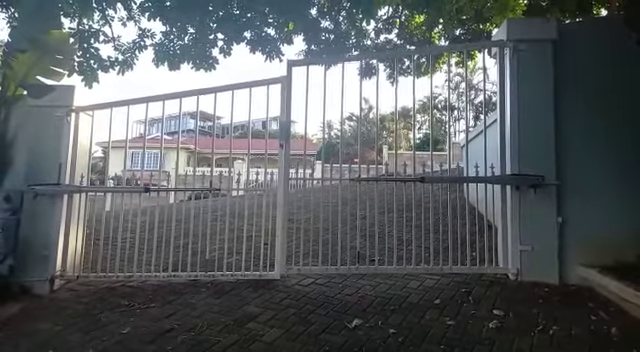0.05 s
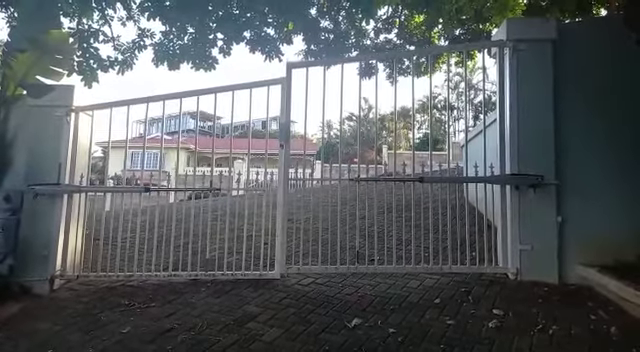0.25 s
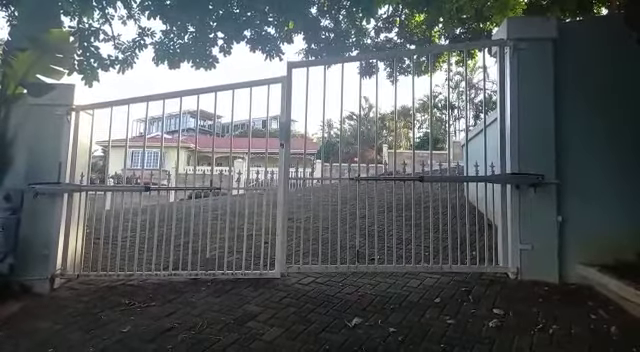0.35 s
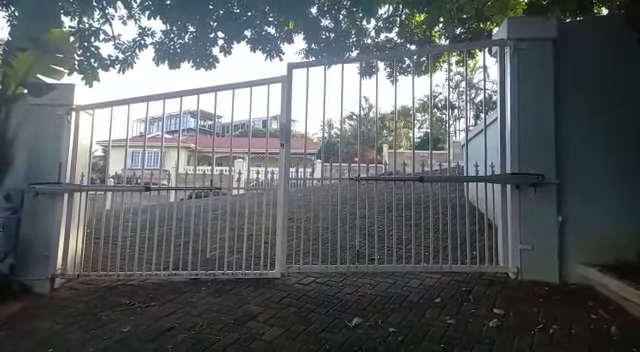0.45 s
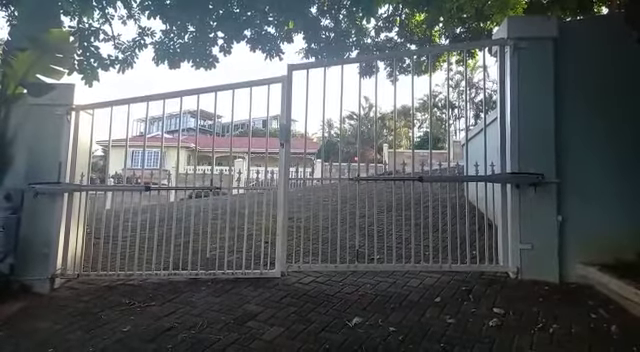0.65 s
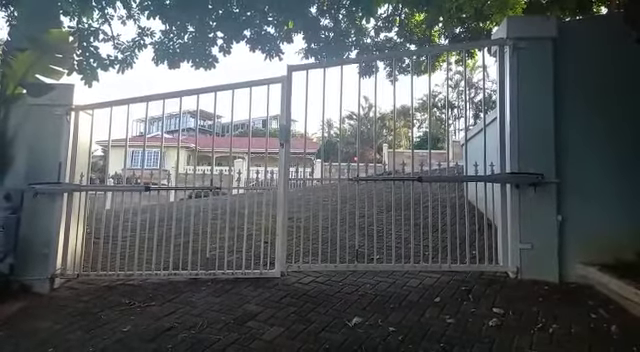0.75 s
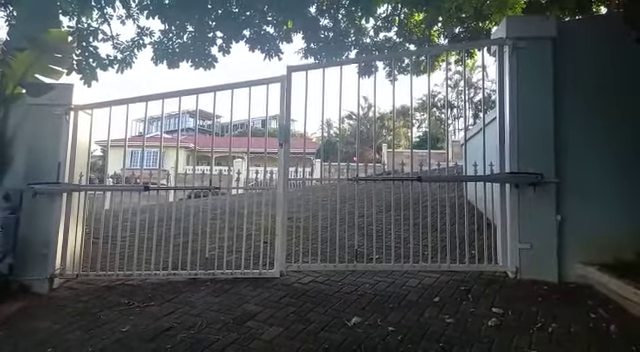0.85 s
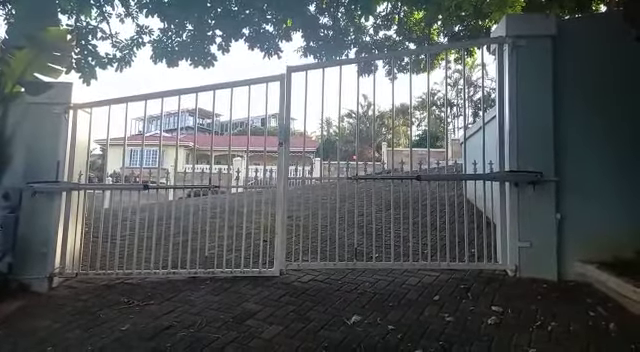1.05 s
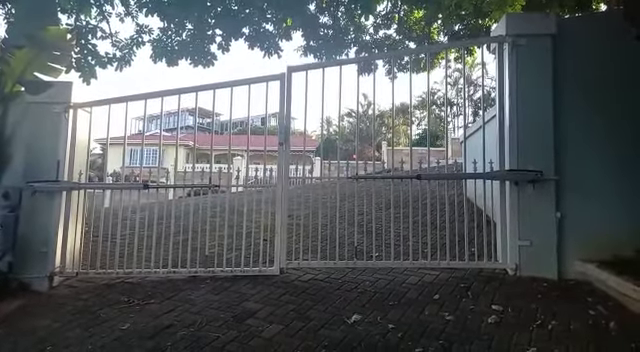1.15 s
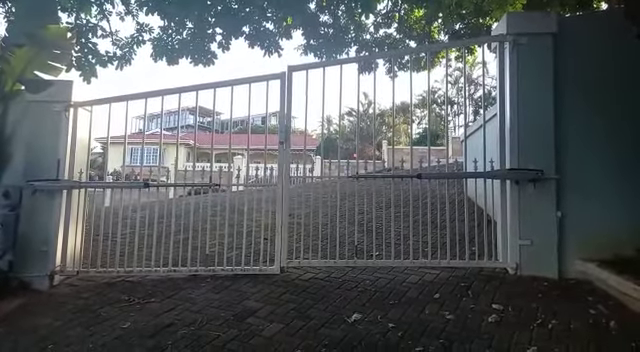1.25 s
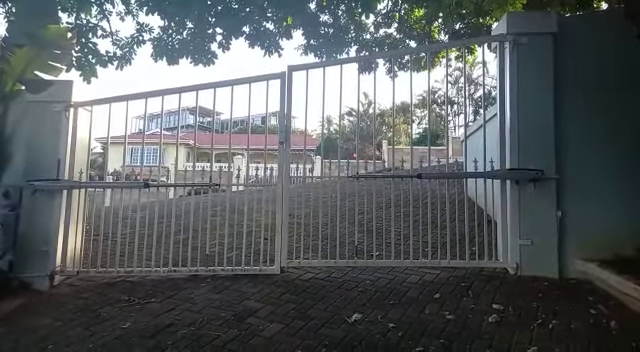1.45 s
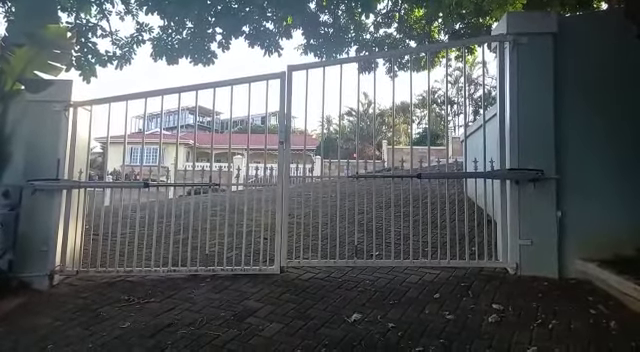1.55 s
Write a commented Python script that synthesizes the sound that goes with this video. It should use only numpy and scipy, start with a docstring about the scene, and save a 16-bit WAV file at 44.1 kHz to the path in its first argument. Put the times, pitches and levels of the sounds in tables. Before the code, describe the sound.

A metal gate latch clacks, a bar rings, and the latch slams shut.

```python
"""A metal gate is worked between hard driveway walls: the latch clacks open, a steel bar is knocked and
rings, metal slides, the frame bumps softly twice and the latch slams home. Each blow is a few quick
contacts that crack and set the metal ringing; the slides are showers of tiny catches. The walls add a
dense, short echo. Underneath lie a low outdoor rumble, steady air, a faint hiss and a hollow drone."""
import sys
import numpy as np
from scipy import signal
from scipy.fft import rfft, irfft
from scipy.io import wavfile
from scipy.ndimage import uniform_filter1d

SR = 44100
rng = np.random.default_rng(int(sys.argv[2]) if len(sys.argv) > 2 else 0)


def pcm_store(signal):
    """Save signal as 16-bit PCM."""
    levels = np.round(np.clip(np.atleast_2d(signal), -1, 1) * 32767)
    wavfile.write(sys.argv[1], SR, levels.astype(np.int16).T)


N = 70560


def latch_release():
    """The latch lets go in two quick contacts: a dry clack with a short ring."""
    # latch contacts (time [s], crack level [dB], ring level [dB])
    contacts = [(.199, -50.5, -51.5), (.207, -46.5, -78)]
    # tone of the crack (frequency [Hz], gain [dB])
    tone = [(110, -20.5), (200, -7), (520, -12), (780, -3), (1100, -7), (1400, 0.5), (2100, -4.5),
            (2800, -10), (4400, -0.5), (6100, -4.5), (7300, -14.5), (11600, -24), (15000, -38)]
    # latch resonances (frequency [Hz], relative level [dB], t60 [s])
    modes = [(770, -7, .06), (1010, -8, .06), (1330, -5, .08), (1698, -7, .08), (2100, -6, .08),
             (4310, 0, .07), (4600, -2, .07), (5378, -6, .08), (6207, -5, .1)]
    return clank(contacts, tone, modes, lead_s=.00009, ring_echo_db=3)


def latch_slam():
    """The latch touches, then slams home with a hard, bright crack."""
    # touch and slam (time [s], crack level [dB], ring level [dB])
    contacts = [(1.229, -53, -82), (1.232, -44.5, -51.5)]
    # tone of the crack (frequency [Hz], gain [dB])
    tone = [(300, -40), (450, -19), (650, -9), (1000, -10.5), (1300, -5.5), (2000, -2), (2400, -3),
            (2900, -1.5), (3400, -3), (4000, -1.5), (5200, -2), (6200, -12.5), (7400, -17.5), (8600, -16),
            (9700, -27.5), (10800, -16), (12000, -29.5), (15500, -33.5)]
    # resonances of the closing latch (frequency [Hz], relative level [dB], t60 [s])
    modes = [(1440, -8, .05), (1700, -7, .07), (2085, -2, .11), (2482, -6, .08), (2907, 1, .08),
             (3787, -3, .08), (4086, -3, .07), (4360, -5, .08), (4592, -4, .07), (4962, 0, .09),
             (5205, -2, .08)]
    return clank(contacts, tone, modes, lead_s=.00005, ring_echo_db=3)


def steel_bar():
    """A knocked bar chatters against its stop and rings on in close, beating modes."""
    # knock and chatter (time [s], crack level [dB], ring level [dB])
    contacts = [(.322, -53, -64), (.3245, -49.5, -43), (.3444, -59, -45.5), (.4057, -70, -50.5)]
    # tone of the knock (frequency [Hz], gain [dB])
    tone = [(150, -8), (500, -10.5), (1000, 0), (1500, 7), (2100, 10), (2800, 0.5), (3300, -1), (4400, 4),
            (5400, -8.5), (8000, -24), (15000, -47)]
    # bar resonances (frequency [Hz], relative level [dB], t60 [s])
    modes = [(1284, -9, .26), (1296, -7, .29), (1302, 0, .42), (1372, -9, .34), (1585, -15, .26),
             (1700, -22, .22), (1883, -19, .22), (1950, -14, .3), (2080, -17, .25), (2467, -22, .28),
             (4164, -18, .16), (4368, -21, .1)]
    return clank(contacts, tone, modes, lead_s=.00022, ring_echo_db=-3.5)


def frame_bumps():
    """The frame takes two soft double bumps and answers with a lower, duller ring."""
    # frame contacts (time [s], crack level [dB], ring level [dB])
    contacts = [(.696, -76, -73.5), (.722, -71, -77), (1.103, -77.5, -75), (1.133, -78, -84)]
    # tone of a bump (frequency [Hz], gain [dB])
    tone = [(200, -2.5), (500, -7), (800, 4.5), (1050, 1), (1600, -5), (2600, -8), (5000, -42)]
    # frame resonances (frequency [Hz], relative level [dB], t60 [s])
    modes = [(756, 4.5, 0.2), (734, -10, 0.19), (821, 4, 0.064), (970, -11, 0.047)]
    return clank(contacts, tone, modes, lead_s=.00005, ring_echo_db=3)


def clank(contacts, tone, modes, lead_s, ring_echo_db):
    """Metal meets metal in quick contacts; each one cracks and sets the part ringing."""
    contact_s, crack_direct_db = .00094, -13.5
    t, straight, echo, out = seconds(), direct(lead_s), walls(), 0
    ringing = ring(modes, straight + undb(ring_echo_db) * echo)
    for onset_s, crack_db, ring_db in contacts:
        grit = rng.standard_normal(N) * np.exp(-t / contact_s)
        flat_grit = irfft(np.exp(1j * np.angle(rfft(grit))), N)  # equally strong at every frequency
        force = flat_grit * (t < 10 * contact_s)
        crack = through(colour(force, tone), undb(crack_direct_db) * straight + echo)
        out = out + delay(level(crack, crack_db) + undb(ring_db) * ringing, onset_s)
    return out


def ring(modes, path):
    """Decaying modes of a steel part, heard along a stereo path."""
    t, out = seconds(), 0
    attack = 1 - np.exp(-t / .001)
    for hz, db, t60 in modes:
        partial = attack * np.sin(2 * np.pi * hz * t) * np.exp(-np.log(1000) * t / t60)
        out = out + level(through(partial, path), db)
    return level(out, 0)


def slides():
    """Metal slips over metal in dense tiny catches that swell and fade, heard through the wall echo."""
    # strokes (peak time [s], rise [s], fall [s], level [dB], tilt [dB/octave])
    strokes = [(0.0, 0.0067, 0.036, -74, -3.5), (0.112, 0.063, 0.09, -70.5, -4),
               (0.169, 0.0017, 0.063, -70, -5.5), (0.731, 0.01, 0.012, -68, -1),
               (.765, 0.0072, 0.0067, -67.5, -0.5)]
    # tone of the scrape (frequency [Hz], gain [dB])
    tone = [(400, -14.5), (750, -11), (1100, -4.5), (1600, 0.5), (2100, 0), (3000, -4), (3800, -2),
            (4350, 3.5), (5000, -5.5), (6200, -6), (8000, -22.5), (10000, -50), (14000, -43)]
    catches_per_s, scatter_db = 2500, 2
    t, echo, out = seconds(), walls(), 0
    for peak_s, rise_s, fall_s, db, tilt_db in strokes:
        catches = (rng.random(N) < catches_per_s / SR) * rng.standard_normal(N)
        catches *= undb(scatter_db * rng.standard_normal(N))
        pressure = np.exp(-np.maximum((peak_s - t) / rise_s, (t - peak_s) / fall_s))
        scrape = colour(catches * pressure, tone, tilt_db)
        out = out + level(through(scrape, echo), db)
    return out


def direct(lead_s):
    """The straight path to two microphones, reaching the left one lead_s earlier."""
    click = signal.unit_impulse(N)
    return np.array([click, delay(click, lead_s)])


def walls():
    """Echo of the walls: a few distinct early reflections in a dense tail whose bass lasts longest."""
    # decay of the echo (frequency [Hz], t60 [s])
    decay_times = [(150, 0.936), (500, 0.47), (1500, 0.44), (4000, 0.32), (8000, 0.4), (15000, .28)]
    reflections_per_s, early_db, early_decay_s, build_s = 400, -10, .01, .00067
    t, hz, out = seconds(), np.fft.rfftfreq(N, 1 / SR), 0
    early = rng.standard_normal((2, N)) * (rng.random((2, N)) < reflections_per_s / SR)
    early *= undb(early_db) * np.sqrt(SR / reflections_per_s) * np.exp(-t / early_decay_s)
    spectrum = rfft(diffuse(rng.standard_normal((2, N)) + early))
    centres = np.geomspace(100, 16000, 9)
    for centre, weights in zip(centres, np.eye(len(centres))):
        band = irfft(spectrum * at_hz(list(zip(centres, weights)), hz), N)
        out = out + band * np.exp(-np.log(1000) * t / at_hz(decay_times, centre))
    build_up = 1 - np.exp(-t / build_s)
    return level(out * build_up, 0) / np.sqrt(N)  # unit energy


def outdoors():
    """Beds of shaped noise: a wavering rumble, steady air, a faint hiss and a hollow drone."""
    # tone of each bed (frequency [Hz], gain [dB])
    rumble_tone = [(25, -44.5), (45, -26), (68, 11.5), (85, 10), (115, 2), (200, -28.5), (400, -36)]
    air_tone = [(100, 5), (200, -1), (400, -4), (800, -14), (1500, -29), (3000, -33), (6600, -67)]
    hiss_tone = [(2500, -6), (4000, -2), (6600, 0), (7800, -16), (15500, -19)]
    drone_tone = [(500, -50.5), (700, 12), (775, 19), (860, 12.5), (1100, 2.5), (1900, 9), (3000, -36.5)]
    # swells of the hiss and the drone (time [s], level [dB])
    hiss_swell = [(0, -73), (.6, -71.5), (1, -75.5), (1.25, -71), (1.58, -75)]
    drone_swell = [(0, -66.5), (.6, -72.5), (.9, -72), (1.2, -65), (1.45, -88)]
    rumble = bed(rumble_tone) * undb(-62.5 + 1.5 * waver(rate_hz=10.47))
    air = bed(air_tone) * undb(-65.5)
    hiss = bed(hiss_tone) * fader(hiss_swell)
    drone = bed(drone_tone) * fader(drone_swell)
    return rumble + air + hiss + drone


def bed(tone):
    """Wide stereo noise of a given tone, at unit rms."""
    return level(colour(diffuse(rng.standard_normal((2, N))), tone), 0)


def diffuse(pair):
    """Make two unrelated signals alike in the bass, as two close microphones hear them."""
    corner_hz = 674
    alike = .92 / (1 + (np.fft.rfftfreq(N, 1 / SR) / corner_hz) ** 2)
    a, b = rfft(pair)
    mid, side = a * np.sqrt(1 + alike), b * np.sqrt(1 - alike)
    return irfft(np.array([mid + side, mid - side]), N)


def waver(rate_hz):
    """Smooth random drift at unit rms."""
    hold = int(SR / rate_hz)
    steps = np.repeat(rng.standard_normal(N // hold + 1), hold)
    return level(uniform_filter1d(uniform_filter1d(steps, hold), hold)[:N], 0)


def fader(points):
    """Gain that rides through (time [s], level [dB]) points."""
    return undb(np.interp(seconds(), *np.array(points).T))


def colour(x, points, tilt_db=0):
    """Causal filter through (frequency [Hz], gain [dB]) points, falling away below the lowest one."""
    size = 2 * N
    hz = np.maximum(np.fft.rfftfreq(size, 1 / SR), 1)
    bass_loss_db = 10 * np.log10(1 + (points[0][0] / 2 / hz) ** 4)
    db = at_hz(points, hz) + tilt_db * np.log2(hz) - bass_loss_db
    cepstrum = irfft(np.log(undb(db)))
    cepstrum[1:N] *= 2  # minimum phase: nothing sounds ahead of the attack
    cepstrum[N + 1:] = 0
    return irfft(rfft(x, size) * np.exp(rfft(cepstrum)))[..., :N]


def at_hz(points, hz):
    """Read (frequency [Hz], value) points on a log-frequency axis."""
    p = np.array(points, float)
    return np.interp(np.log(np.maximum(hz, 1)), np.log(p[:, 0]), p[:, 1])


def through(x, response):
    """Convolve a sound with a two-channel response."""
    return signal.fftconvolve(np.atleast_2d(x), response, axes=-1)[:, :N]


def delay(x, s):
    """The same sound, s seconds later."""
    shift = int(np.clip(s * SR, 0, N - 1))
    return np.concatenate([np.zeros_like(x[..., :shift]), x[..., :N - shift]], axis=-1)


def level(x, db):
    """Each channel set to an rms level over its whole length."""
    return x * undb(db) / np.sqrt(np.mean(x ** 2, axis=-1, keepdims=True) + 1e-30)


def undb(db):
    """Decibels to gain."""
    return 10 ** (np.asarray(db) / 20)


def seconds():
    """Time of every sample."""
    return np.arange(N) / SR


def scene():
    """Three clanks and small handling sounds over the outdoor beds, all leaning slightly right."""
    right_lean_db = 1.25
    gate = latch_release() + steel_bar() + latch_slam() + frame_bumps() + slides()
    balance = undb(np.array([[-right_lean_db], [right_lean_db]]) / 2)
    return (gate + outdoors()) * balance


def record(dry):
    """The recorder cuts the deepest bass and the top."""
    low_cut_hz, top_hz = 50, 16000
    thinned = signal.sosfilt(signal.butter(4, low_cut_hz, "high", fs=SR, output="sos"), dry)
    return signal.sosfilt(signal.ellip(8, .2, 70, top_hz, fs=SR, output="sos"), thinned)


dry = scene()
out = record(dry)
pcm_store(out)
```